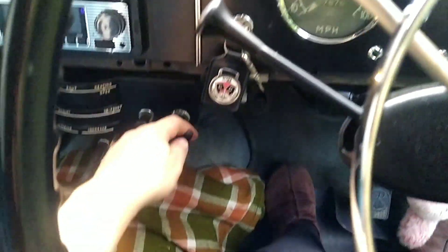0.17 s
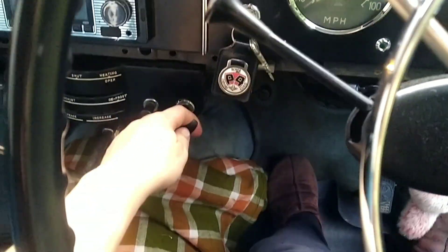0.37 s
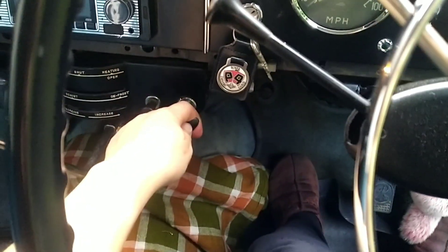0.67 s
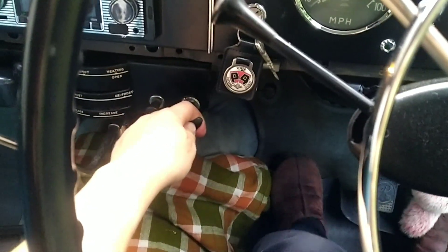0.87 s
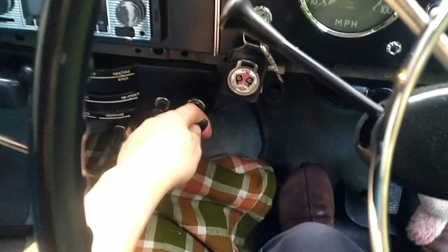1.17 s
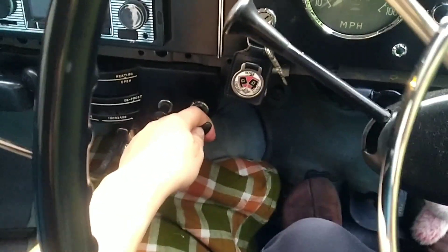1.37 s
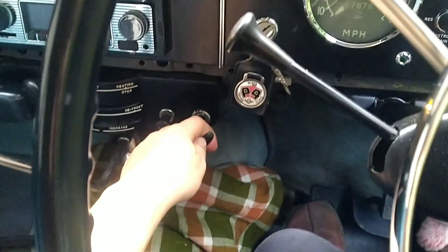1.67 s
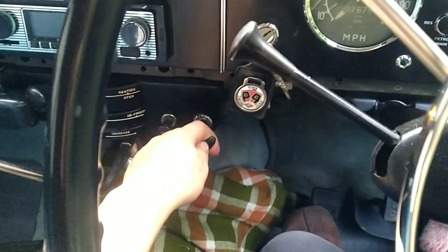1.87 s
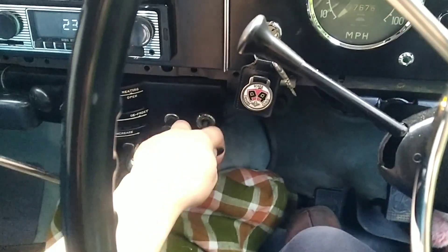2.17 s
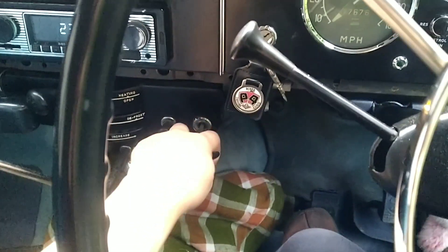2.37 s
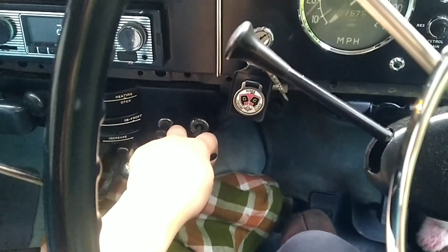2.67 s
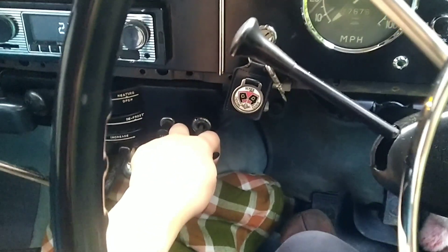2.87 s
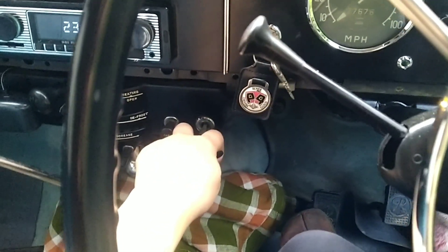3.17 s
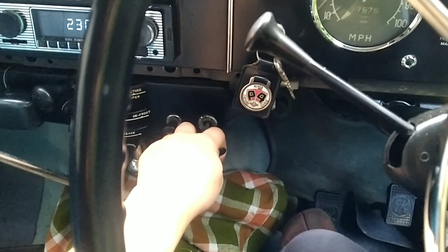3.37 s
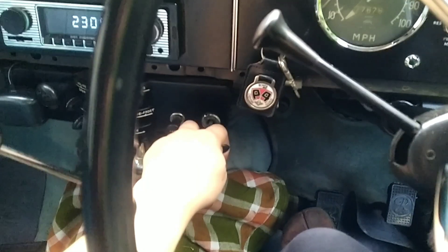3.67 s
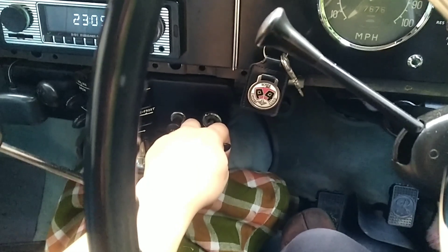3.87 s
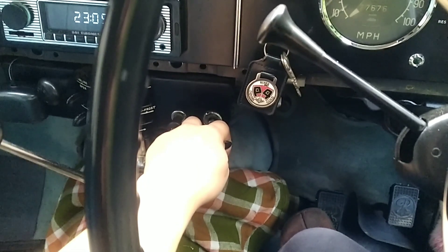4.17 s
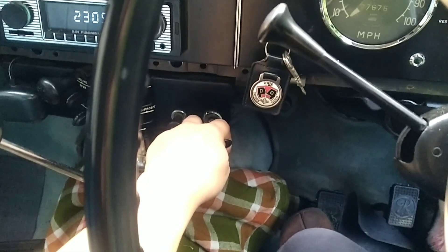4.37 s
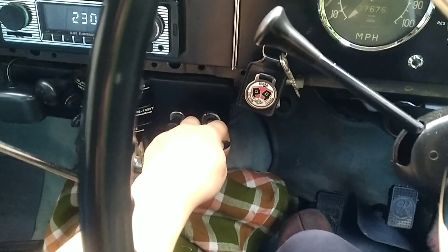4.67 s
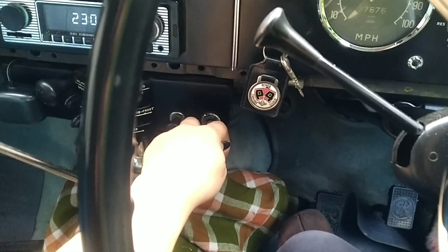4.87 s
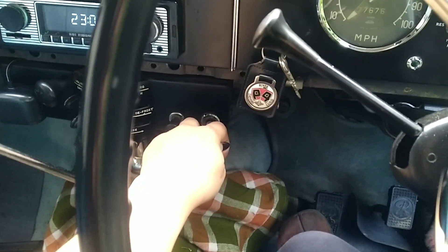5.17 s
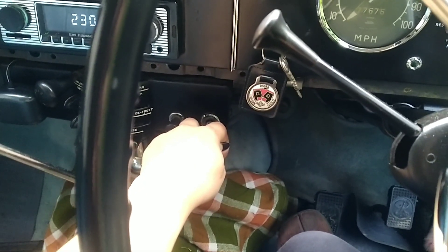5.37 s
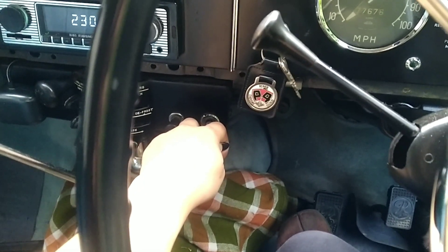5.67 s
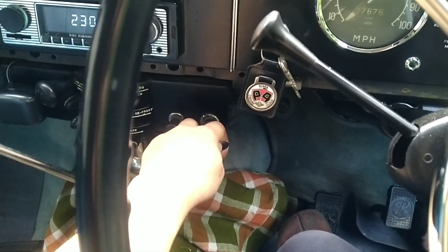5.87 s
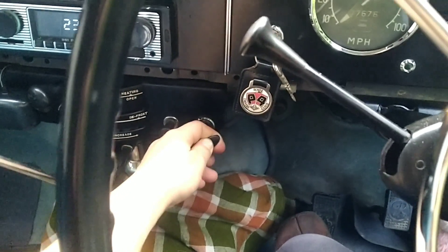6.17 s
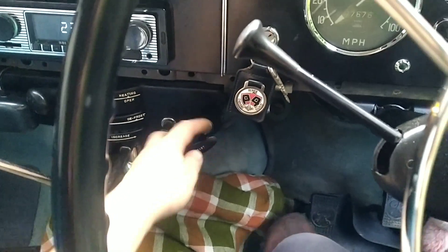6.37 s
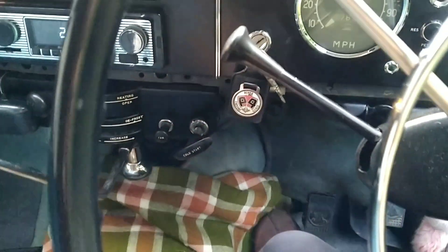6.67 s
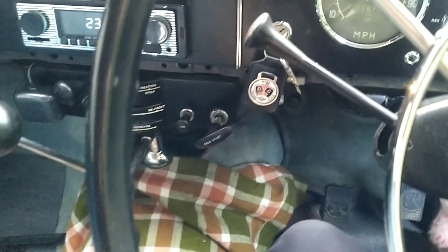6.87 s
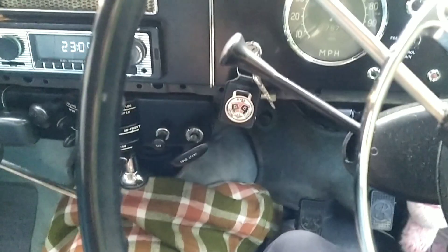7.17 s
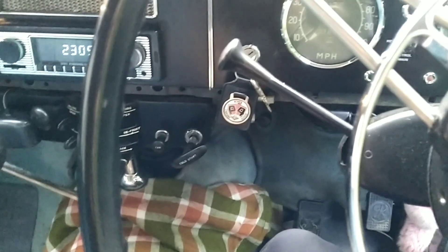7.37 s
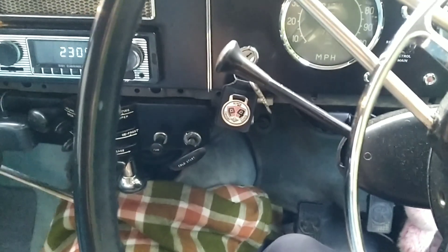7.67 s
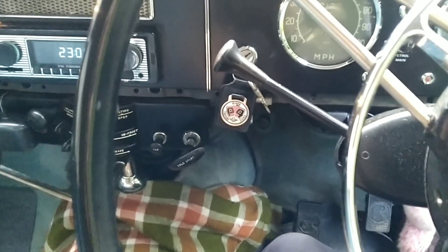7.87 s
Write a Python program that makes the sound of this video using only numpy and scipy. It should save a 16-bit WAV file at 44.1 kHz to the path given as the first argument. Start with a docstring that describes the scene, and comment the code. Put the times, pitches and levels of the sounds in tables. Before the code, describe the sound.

A dashboard knob clicks over an old car's booming fast idle, which settles to a quieter, uneven idle and picks up at the end.

```python
"""Inside an old car, a cold six-cylinder engine idles fast, drops to a slower, lumpier idle that
stumbles now and then, and picks up at the end. Harmonics of the crank rate (orders) boom as they slide
through the cabin's resonances, and uneven firings set the cabin air rumbling. Valve impacts patter,
turbulent air rushes and hisses in the intake, and faint tones whine under the bonnet.
Close by, a knob clicks under the driver's hand and the dashboard ticks and knocks."""
import sys
import numpy as np
from scipy import signal
from scipy.fft import rfft, irfft, next_fast_len
from scipy.io import wavfile
from scipy.ndimage import uniform_filter1d, map_coordinates

SR = 44100
rng = np.random.default_rng(int(sys.argv[2]) if len(sys.argv) > 2 else 0)


def unload_audio(sound):
    """Save the sound as a 16-bit wav file, at the path given as the first command line argument."""
    columns = np.transpose(np.atleast_2d(sound))
    # keep every value between -1 and 1, then stretch to whole-number steps
    steps = np.round(np.clip(columns, -1, 1) * 32767)
    wavfile.write(sys.argv[1], SR, steps.astype(np.int16))


N = 352932
TIME_S = np.arange(N) / SR
FAST_IDLE_RPM, SLOW_IDLE_RPM = 1100, 880


def amp(db):
    """Decibels to amplitude ratio."""
    return 10 ** (np.asarray(db) / 20)


def unit_rms(x):
    """Normalisation to rms 1."""
    return x / np.sqrt(np.mean(x ** 2) + 1e-20)


def gain_db_at(spectrum, hz):
    """Interpolation of a spectrum on a logarithmic frequency axis."""
    knots_hz, gains_db = np.transpose(spectrum)
    return np.interp(np.log(hz + 1), np.log(knots_hz + 1), gains_db)


def wobble(knots_per_s):
    """Smooth random modulation: a spline through Gaussian values."""
    knots = rng.standard_normal(int(N * knots_per_s / SR) + 4)
    return map_coordinates(knots, [TIME_S * knots_per_s])


def filtered(x, response):
    """Linear filtering: the spectrum is multiplied by a frequency response."""
    size = next_fast_len(N + SR // 2)
    return irfft(rfft(x, size) * response(np.fft.rfftfreq(size, 1 / SR)), size)[:N]


def coloured(x, spectrum):
    """Spectral shaping, normalised to rms 1."""
    return unit_rms(filtered(x, lambda hz: amp(gain_db_at(spectrum, hz))))


def noise(spectrum):
    """Coloured Gaussian noise of rms 1."""
    return coloured(rng.standard_normal(N), spectrum)


def resonances(modes, hz):
    """Modal superposition: the summed responses of damped oscillators."""
    return sum(amp(db) * 1j * hz * width / (centre ** 2 - hz ** 2 + 1j * hz * width)
               for centre, width, db in modes)


def flicker(x, depth_db):
    """Random modulation in small patches of time and frequency makes the timbre flicker."""
    spectra = signal.stft(x, nperseg=1024)[2]
    field = uniform_filter1d(rng.standard_normal(spectra.shape), size=4, axis=0)
    field = uniform_filter1d(field, size=12, axis=1)
    return signal.istft(spectra * amp(depth_db * unit_rms(field)), nperseg=1024)[1][:N]


def crank_events(turns, per_turn):
    """Sample positions of events at equal steps of crank angle."""
    return np.flatnonzero(np.diff(np.floor(turns * per_turn)))


def speed_gain(rpm, growth_db):
    """Power law: growth_db per tenfold speed, with unit gain at the fast idle."""
    return amp(growth_db * np.log10(rpm / FAST_IDLE_RPM))


# Spectrum of the carburettor's hiss: frequency_hz, gain_db
HISS_SPECTRUM = [(20, -7), (300, 5), (3800, 2.5), (4450, -19), (5100, 2.5), (6200, 3), (7600, 7.5),
                 (8000, -15.5), (8500, -19)]

def carburettor_hiss(rpm, load_db, level_db=-61.5, load_share=1.5):
    """Turbulence in the carburettor gives broadband noise, a little more as the throttle opens."""
    return amp(level_db + load_share * load_db) * speed_gain(rpm, growth_db=9) * noise(HISS_SPECTRUM)


# Thin tones under the bonnet at the fast idle: pitch_hz, level_db
WHINE_TONES = [(943, -63), (1995, -67), (2817, -73), (4469, -85)]

def whines(rpm, drift_hz=4, flutter_db=3):
    """Amplitude and frequency modulation make faint tones waver; they fade as the engine slows."""
    tones = np.zeros(N)
    for hz, db in WHINE_TONES:
        strength = amp(db + flutter_db * wobble(14))
        cycles = np.cumsum(hz + drift_hz * wobble(25)) / SR
        tones += strength * np.sin(2 * np.pi * cycles)
    return tones * speed_gain(rpm, growth_db=80)


# Standing waves of the cabin air: centre_hz, bandwidth_hz, gain_db
CABIN_AIR_MODES = [(73, 10, -23.5), (104.1, 7.3, 2), (131, 26, -7), (207, 13, -5), (304, 33, -12.5)]

def cabin_air(pushes, cutoff_hz, slope):
    """Enclosed air rings at its normal modes when driven by low-passed impulses."""
    return filtered(pushes, lambda hz: resonances(CABIN_AIR_MODES, hz) / (1 + (hz / cutoff_hz) ** slope))


def jolts(events):
    """Impulse response: each event rings the cabin air once; the strongest sets the peak level."""
    pushes = np.zeros(N)
    for start_s, db, *_ in events:
        pushes[round(start_s * SR)] = amp(db)
    ring = cabin_air(pushes, cutoff_hz=220, slope=4)
    return ring * pushes.max() / np.abs(ring).max()


def contacts(events, spectrum, rise_s):
    """Heavy damping leaves a short noise burst of each contact; softer contacts rise more slowly."""
    envelope = np.zeros(N)
    for start_s, db, t60_s in events:
        age_s = np.clip(TIME_S - start_s, 0, 1)
        envelope += amp(db - 60 * age_s / t60_s) * (1 - np.exp(-age_s / rise_s))
    return envelope * noise(spectrum)


# Ticks of the dashboard fittings: start_s, level_db, t60_s
FITTING_TICKS = [(0.637, -49, 0.02), (1.523, -46.5, 0.019), (2.640, -43, 0.023), (5.028, -45.5, 0.014),
                 (5.162, -30.5, 0.004), (5.336, -35.5, 0.006)]
# Spectrum of a tick: frequency_hz, gain_db
TICK_SPECTRUM = [(300, -1), (1500, 0), (4500, -2), (7800, -1)]

def fitting_ticks():
    """Hard, brief contacts spread their energy over a wide band."""
    return contacts(FITTING_TICKS, TICK_SPECTRUM, rise_s=0.0001)


# Dull knocks in the panel: start_s, level_db, t60_s
PANEL_KNOCKS = [(0.901, -27.5, 0.16), (1.441, -31, 0.062), (1.457, -32, 0.049)]
# Spectrum of a knock: frequency_hz, gain_db
KNOCK_SPECTRUM = [(100, -15.5), (400, 7.5), (800, -5), (1200, -4.5), (2000, -22.5), (4000, -27),
                  (8000, -49)]

def panel_knocks(boom_db=12):
    """Soft contacts excite mainly low frequencies, and the panel couples them to the cabin air."""
    return contacts(PANEL_KNOCKS, KNOCK_SPECTRUM, rise_s=0.0018) + amp(boom_db) * jolts(PANEL_KNOCKS)


# Snap and rattle of the knob and its cable: start_s, level_db
KNOB_SNAPS = [(0.878, -38.5), (0.879, -35), (0.887, -47.5), (0.898, -41)]
# Spectrum of the crack and scrape: frequency_hz, gain_db
KNOB_SPECTRUM = [(200, -11), (700, -0.5), (1200, 0.5), (2000, 2.5), (3000, 6.5), (3800, 1), (4800, 1),
                 (5800, -7.5), (7500, -11.5)]
# Modes of the knob's metal stem: pitch_hz, gain_db, t60_s
STEM_MODES = [(1125, 0, 0.11), (1500, -2, 0.05), (2370, -9, 0.03), (2890, -4, 0.033), (3830, -6.5, 0.045),
              (4480, 0.5, 0.049), (4920, -3.5, 0.035), (5100, -4.5, 0.022), (6740, -8.5, 0.02),
              (7600, -18.5, 0.018)]

def knob(crack_db=-3, crack_t60_s=0.029, scrape_db=-42, scrape_t60_s=0.13):
    """Each impact cracks and sets the stem in free vibration, while the cable scrapes in its sleeve."""
    scrape = contacts([(KNOB_SNAPS[0][0], scrape_db, scrape_t60_s)], KNOB_SPECTRUM, rise_s=0.002)
    t = np.arange(SR // 5) / SR
    grit = noise(KNOB_SPECTRUM)
    clicks = np.zeros(N)
    for start_s, db in KNOB_SNAPS:
        span = slice(round(start_s * SR), round(start_s * SR) + len(t))
        ring = np.zeros(len(t))
        for hz, mode_db, t60_s in STEM_MODES:
            decay = amp(mode_db + rng.standard_normal() - 60 * t / t60_s)
            ring += decay * np.sin(2 * np.pi * (hz * t + rng.random()))
        crack = amp(crack_db - 60 * t / crack_t60_s) * grit[span]
        clicks[span] += amp(db) * (ring / 2 + crack)
    return scrape + clicks


# Spectrum of the intake's rush: frequency_hz, gain_db
INTAKE_SPECTRUM = [(120, -32.5), (270, -13.5), (340, -5), (500, -5.5), (800, -10), (1100, -10), (1600, -15),
                   (2300, -19.5), (3700, -27.5), (5000, -29), (8000, -35)]

def intake(rpm, turns, gulp_depth=0.12):
    """Flow noise, modulated by one gulp of air per firing, grows steeply with speed."""
    gulps = 1 + gulp_depth * np.cos(2 * np.pi * 3 * turns)
    return unit_rms(gulps * noise(INTAKE_SPECTRUM)) * speed_gain(rpm, growth_db=65)


# Spectrum of the valve taps: frequency_hz, gain_db
VALVE_SPECTRUM = [(120, -39.5), (270, -15.5), (335, 2.5), (470, 3.5), (570, -0.5), (720, -6.5),
                  (800, -14.5), (1080, -20), (1270, -21.5), (1700, -19.5), (1950, -20), (2250, -19.5),
                  (3700, -30.5), (4400, -44.5), (8000, -44.5)]
# Modes of the engine block and its covers: centre_hz, bandwidth_hz, gain_db
ENGINE_BLOCK_MODES = [(720, 25, -1.5), (936, 17, 2), (1080, 110, -1.5), (1377, 74, -9.5), (1497, 30, -6),
                      (1855, 100, -8), (1971, 12, -4.5), (2890, 21, -13), (3480, 390, -17.5)]

def valve_gear(rpm, turns, t60_s=0.06, rise_s=0.0016, scatter_db=1.5, looseness=0.45, block_db=-9):
    """Periodic impacts: twelve valves, each with its own ring, excite the block once every two turns."""
    starts = crank_events(turns, per_turn=6)
    t = np.arange(SR // 10) / SR
    envelope = amp(-60 * t / t60_s) * (1 - np.exp(-t / rise_s))  # the bulkhead softens each tap
    rings = envelope * rng.standard_normal((12, len(t)))
    strengths = amp(scatter_db * rng.standard_normal(len(starts)))
    taps = np.zeros(N + len(t))
    for i, start in enumerate(starts):
        play = looseness * envelope * rng.standard_normal(len(t))  # clearance varies each tap
        taps[start:start + len(t)] += strengths[i] * (rings[i % len(rings)] + play)
    block = filtered(taps[:N], lambda hz: resonances(ENGINE_BLOCK_MODES, hz) / (1 + (hz / 3900) ** 16))
    patter = coloured(taps[:N], VALVE_SPECTRUM) + amp(block_db) * unit_rms(block)
    return patter * speed_gain(rpm, growth_db=8)


def firing_rumble(rpm, turns, level_db=-38):
    """Random excitation: scatter in firing strength shakes the cabin air, most at low speed."""
    firings = crank_events(turns, per_turn=3)
    pushes = np.zeros(N)
    pushes[firings] = rng.standard_normal(len(firings))
    rumble = unit_rms(cabin_air(pushes, cutoff_hz=340, slope=8))
    return amp(level_db) * speed_gain(rpm, growth_db=-17) * rumble


# Set speed of the crank: time_s, speed_rpm
SET_SPEED = [(0, 1096), (0.38, 1092), (0.51, 1064), (0.88, 1096), (2.35, 1099), (2.7, 1084), (3.1, 1104),
             (3.45, 1088), (3.62, 1040), (3.85, 1006), (4.08, 924), (4.45, 897), (5.8, 866), (6.3, 887),
             (7.05, 882), (7.77, 910), (7.87, 972), (8, 1200)]
# Weak firings that make the slow idle stumble: start_s, jolt_db
WEAK_FIRINGS = [(4.562, -28.5), (4.83, -25), (5.171, -20.5), (5.34, -19), (6.86, -24)]

def crank(sag_rpm=25.9, sag_s=0.03, hunt_rpm=4, load_db_per_rpm_s=0.0011, smooth_s=0.053):
    """Rotational inertia: acceleration loads the engine; the flywheel rides out each weak firing."""
    set_rpm = np.interp(TIME_S, *np.transpose(SET_SPEED))
    ages = np.array([np.maximum(TIME_S - start_s, 0) for start_s, _ in WEAK_FIRINGS]) / sag_s
    sag = sag_rpm * np.sum(ages * np.exp(1 - ages), axis=0)
    hunting = hunt_rpm * (SLOW_IDLE_RPM / set_rpm) ** 4 * wobble(14)  # a slow engine turns less evenly
    rpm_per_s = uniform_filter1d(np.gradient(set_rpm) * SR, size=int(smooth_s * SR))
    return set_rpm - sag + hunting, load_db_per_rpm_s * rpm_per_s


# Harmonics of six unequal cylinders, three firings a turn: crank_multiple, source_level_db
ENGINE_ORDERS = [(3, -31.5), (4, -42.5), (5, -40.5), (6, -19.5), (7, -36.5), (8, -46), (9, -28.5),
                 (10, -42.5), (11, -43.5), (12, -26), (13, -33.5), (14, -44.5), (15, -36), (16, -48.5),
                 (18, -38), (20, -42.5), (21, -45.5), (24, -51), (27, -52.5), (30, -58)]
# Cabin response, booming near 110, 200 and 300 Hz: frequency_hz, gain_db
CABIN_RESPONSE = [(40, -13.5), (75, -2), (88, -8), (102, 1.5), (110, 3.5), (130, -6.5), (172, -21.5),
                  (192, 4), (203, 9.5), (213, 4.5), (222, -12.5), (245, -18), (300, 1), (330, -10),
                  (550, 0)]

def engine_boom(rpm, turns, lag_s=0.014, burble_db=2, waver_db=1.96, lope_db=2.5, steady_db=0.14):
    """Forced resonance: engine orders grow with speed and swell as each crosses a cabin peak."""
    lagged_hz = np.interp(TIME_S - lag_s, TIME_S, rpm) / 60  # a resonance takes a moment to build up
    # at low speed strong and weak turns tend to alternate, so the idle lopes
    lope = np.sin(np.pi * turns + 2.2 * wobble(4.4)) * (SLOW_IDLE_RPM / rpm) ** 6
    throb_order, throb_db = 11.5, -39.5  # beats with its neighbours once per four-stroke cycle
    boom = np.zeros(N)
    for order, db in ENGINE_ORDERS + [(throb_order, throb_db)]:
        if order > 15:
            unsteady_db = burble_db * wobble(30)
        elif order % 6:  # weaker orders follow the cylinders' imbalance
            unsteady_db = waver_db * wobble(9) + lope_db * lope
        else:  # the main boom and its octave hold steady
            unsteady_db = steady_db * wobble(9)
        cabin_db = gain_db_at(CABIN_RESPONSE, lagged_hz * order)
        phase = rng.random() * (order % 6 > 0)  # multiples of six crest together
        boom += amp(db + cabin_db + unsteady_db) * np.cos(2 * np.pi * (order * turns + phase))
    return np.sqrt(2) * boom * speed_gain(rpm, growth_db=38)


def scene(clatter_db=-45, valve_db=-1, intake_db=-2, load_share=1.8, cold_db=1.7, oiling_s=1.8):
    """Superposition of the engine's sounds, all tied to one crank speed, and the dashboard close by."""
    rpm, load_db = crank()
    turns = np.cumsum(rpm) / SR / 60
    boom = amp(load_db) * engine_boom(rpm, turns) + firing_rumble(rpm, turns) + jolts(WEAK_FIRINGS)
    clatter = amp(valve_db) * valve_gear(rpm, turns) + amp(intake_db) * intake(rpm, turns)
    unoiled_db = cold_db * np.exp(-TIME_S / oiling_s)  # louder until oil reaches the valve gear
    clatter = amp(clatter_db + unoiled_db + load_share * load_db) * flicker(clatter, depth_db=1.44)
    background = whines(rpm) + carburettor_hiss(rpm, load_db)
    dashboard = panel_knocks() + knob() + fitting_ticks()
    return (background + dashboard + clatter + boom)[None]


def record(dry, cutoff_hz=8050):
    """Band limiting: an ideal low-pass filter passes nothing above the cutoff."""
    return filtered(dry[0], lambda hz: hz < cutoff_hz)[None]


dry = scene()
out = record(dry)
unload_audio(out)
```